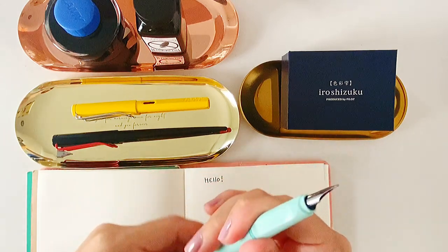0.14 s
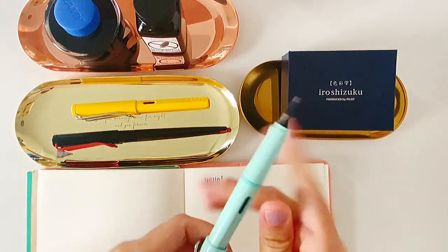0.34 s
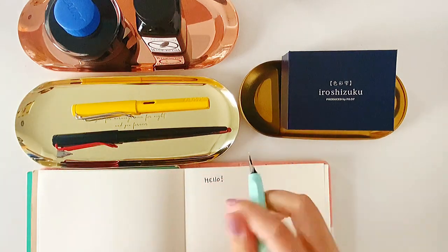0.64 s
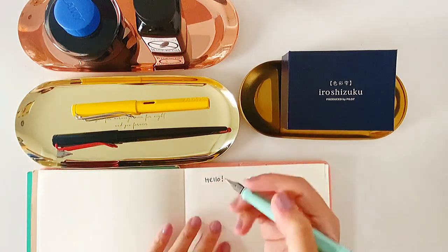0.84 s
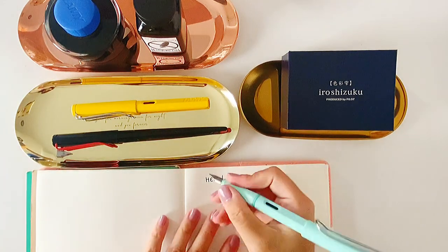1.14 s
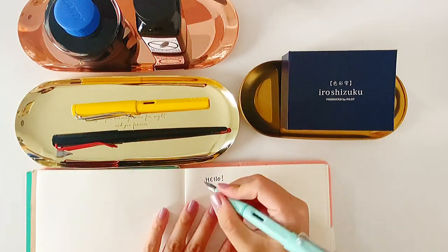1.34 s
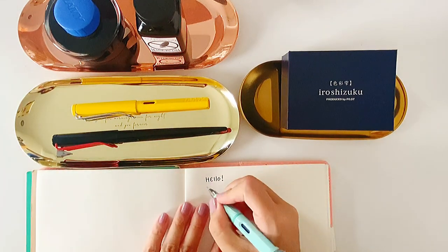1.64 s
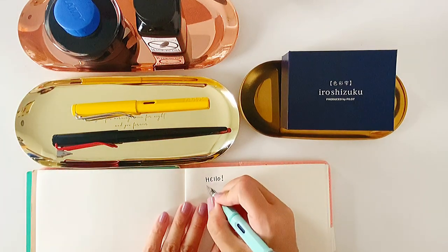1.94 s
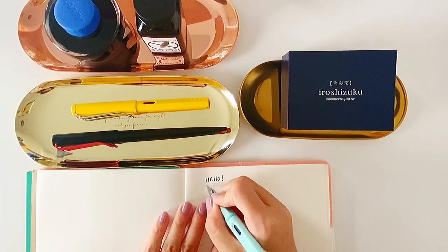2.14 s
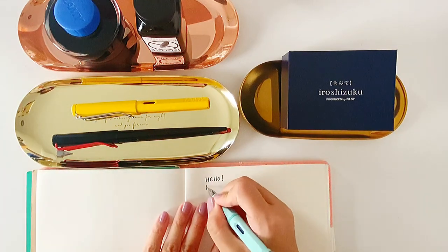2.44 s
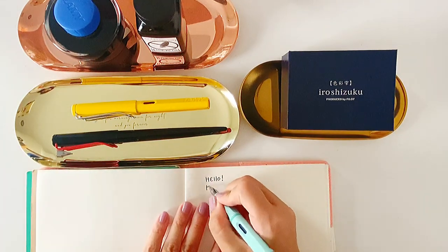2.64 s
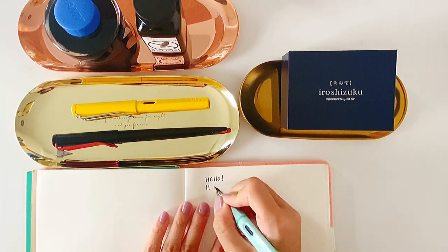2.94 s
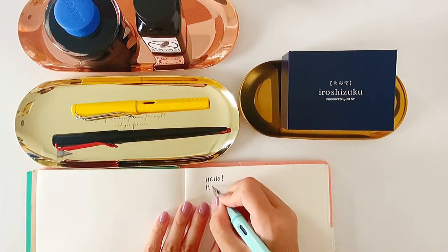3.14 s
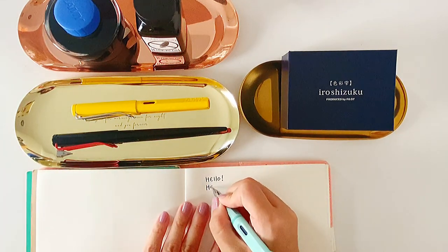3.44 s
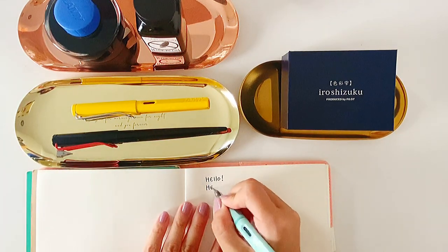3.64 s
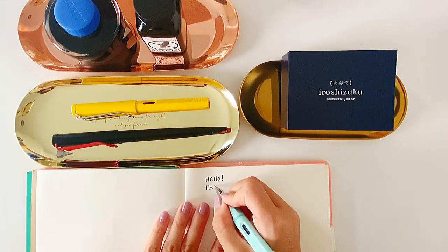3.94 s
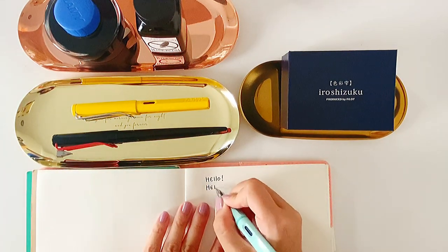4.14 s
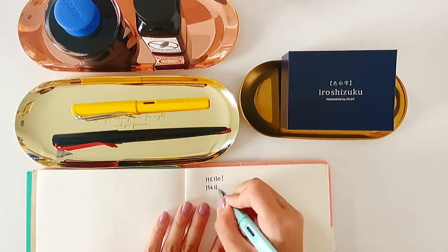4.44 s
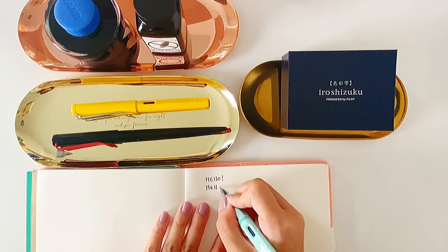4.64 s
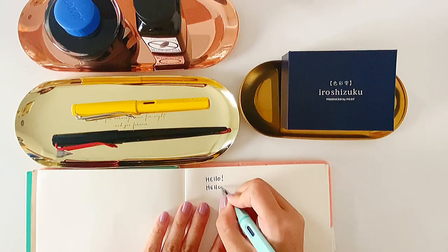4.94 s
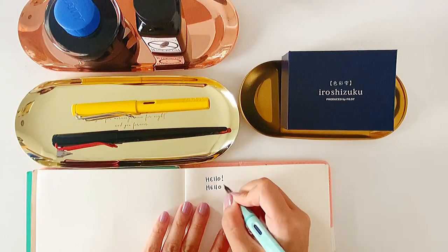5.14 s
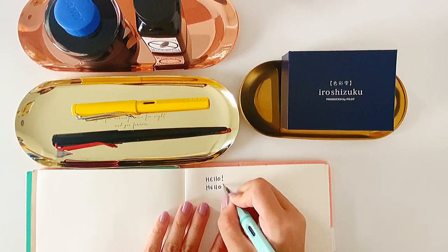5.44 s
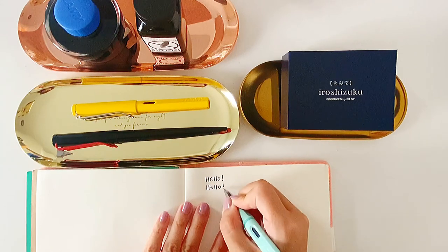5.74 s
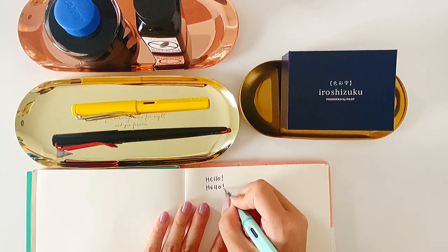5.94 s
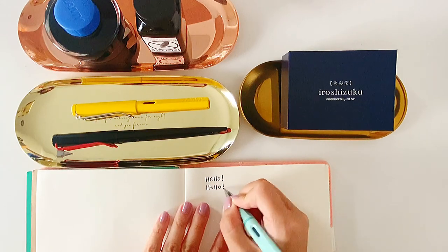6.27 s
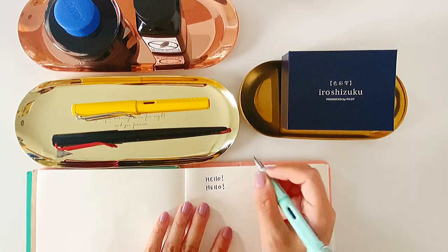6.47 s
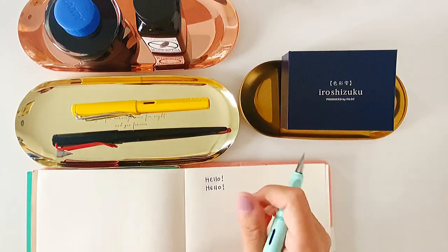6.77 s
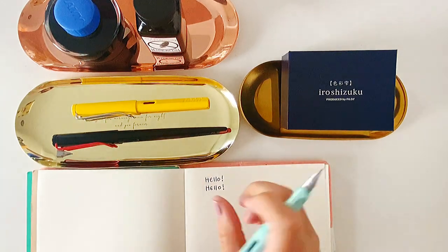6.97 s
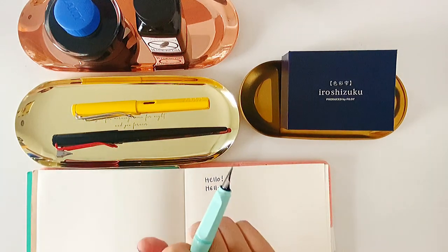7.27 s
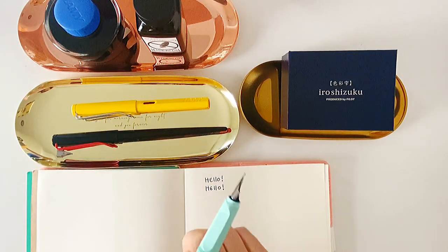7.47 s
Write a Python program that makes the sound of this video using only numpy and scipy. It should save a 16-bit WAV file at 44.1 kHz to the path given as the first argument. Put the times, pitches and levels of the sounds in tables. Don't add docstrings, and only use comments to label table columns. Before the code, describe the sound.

Close desk recording, dry and very quiet: light skin rubs and plastic clicks as a pen is turned, a palm settling on paper, then thin, papery nib scrapes in little groups, some faintly ringing. After the last faint stroke come soft rustles, a few taps, and a rapid stick-slip squeak of finger on barrel. Distant machinery rumbles, throbs and wavers faintly throughout.

```python
import sys
import numpy as np
from scipy import signal
from scipy.fft import rfft, irfft, next_fast_len
from scipy.io import wavfile
from scipy.ndimage import uniform_filter1d

SR = 44100
rng = np.random.default_rng(int(sys.argv[2]) if len(sys.argv) > 2 else 0)


def voltage_ratio(decibels):
    exponent = np.asarray(decibels, float) / 20
    return 10 ** exponent


def transcribe(u):
    v = np.clip(np.atleast_2d(u).T, -1, 1)
    q = np.round(v * 32767).astype(np.int16)
    wavfile.write(sys.argv[1], SR, q)


N = 335601


def evened(x):
    return x / np.sqrt(np.mean(x ** 2) + 1e-20)


def filtered(x, gain):
    size = next_fast_len(len(x))
    spectrum = rfft(x, size) * gain(np.fft.rfftfreq(size, 1 / SR))
    return evened(irfft(spectrum, size)[:len(x)])


def coloured(x, spectrum):
    f, db = np.transpose(spectrum)
    return filtered(x, lambda hz: voltage_ratio(np.interp(np.log(hz + 1), np.log(f + 1), db)))


def mode(x, centre_hz, width):
    return filtered(x, lambda hz: 1 / (1 + 2j * (hz - centre_hz) / width) / (1 + 1j * (hz - centre_hz) / width))


def resonate(x, hz, width):
    turn = np.exp(2j * np.pi * np.cumsum(hz * np.ones(len(x))) / SR)
    r = np.exp(-np.pi * width / SR)
    return 2 * (turn * signal.lfilter([1 - r], [1, -r], x / turn + 1e-18)).real


def wander(per_s):
    return filtered(rng.standard_normal(N), lambda hz: (hz > 8) / (1 + (hz / per_s) ** 4))


def grit(per_s, spread_db):
    size_db = spread_db * np.minimum(rng.exponential(1, N), 4)
    return rng.standard_normal(N) * voltage_ratio(size_db) * (rng.random(N) < per_s / SR)


def add(mix, s, sound):
    part = mix[round(s * SR):][:len(sound)]
    part += sound[:len(part)]


def glide(seconds, rise, fall):
    u = np.linspace(0, 1, round(seconds * SR))
    return np.sin(np.pi / 2 * np.clip(np.minimum(u / rise, (1 - u) / fall), 0, 1)) ** 2


def level(moves, column, rise, fall):
    power = np.zeros(N)
    for row in moves:
        add(power, row[0], (voltage_ratio(row[column]) * glide(row[1], rise, fall)) ** 2)
    return uniform_filter1d(np.sqrt(power), size=250)


def ring(hz, t60, seconds=0.071):
    t = np.arange(round(seconds * SR)) / SR
    return np.sin(2 * np.pi * hz * t) * voltage_ratio(-60 * t / np.maximum(t60, .001))


def burst(hz, t60, spread):
    puff = rng.standard_normal(441) * voltage_ratio(-60 * np.arange(441) / SR / t60)
    band = signal.butter(3, [hz / spread, min(hz * spread, .45 * SR)], "band", fs=SR, output="sos")
    sound = signal.sosfilt(band, np.append(3, 0.47 * puff))
    return sound / abs(sound).max()


# f/Hz, level/dB per Hz
RUMBLE = [(35, -35), (60, -0.5), (73, -5), (87, -11), (113, -9.5), (129, -15), (145, -12.5), (166, -8),
          (232, -12), (250, -18.5), (269, -20.5), (318, -15), (366, -23.5), (388, -29), (440, -24),
          (570, -70), (970, -120)]
AIR = [(240, -6), (400, -9), (528, 1), (645, -7.5), (742, -7.5), (852, -10.5), (979, -6), (1090, -9),
       (1180, -8), (1960, -17.5), (2470, -21), (4440, -28), (6050, -27.5), (15000, -33.5), (16000, -42)]
RUMBLE_DB, AIR_DB = -50, -61
# f/Hz, width/Hz, level/dB
DRONES = [(5.77, 6.9, -40), (16.77, 4.8, -44.5), (42.3, 8.6, -58), (48.84, 2.6, -50), (57.08, 1.08, -50),
          (23.9, 10, -46), (1006, 32, -75), (552, 73, -74.5), (726, 80, -76), (4600, 630, -82.5)]
# t/s, level/dB
MACHINE = [(0.0, -57), (0.47, -56.5), (0.51, -47.5), (0.89, -66.5), (0.95, -52.5), (1.31, -60), (1.35, -53),
           (1.42, -55), (1.82, -56), (1.95, -50), (2.03, -57), (2.09, -54.5), (5.14, -56.5), (6.79, -54.5),
           (7.41, -58), (7.6, -56)]
# f/Hz, width/Hz, level/dB
MACHINE_TONES = [(241.7, 23.6, -3.5), (322.8, 19.2, -8.5), (359.9, 17.5, -9.5)]
# t/s, throb level/dB
THROB = [(0.0, -40.5), (1.99, -37), (2.18, -74), (2.56, -34.5), (3.41, -50), (4.11, -35), (4.3, -49),
         (5.17, -41.5), (7.61, -34)]
THROB_HZ = 25.0
# f/Hz, level/dB, start/turns
HUMS = [(120.2, -62, .0), (121.19, -62, .5)]


def room_tone():
    t = np.arange(N) / SR
    out = voltage_ratio(RUMBLE_DB) * coloured(rng.standard_normal(N), RUMBLE)
    out += voltage_ratio(AIR_DB) * coloured(rng.standard_normal(N), AIR)
    for hz, width, db in DRONES:
        out += voltage_ratio(db) * mode(rng.standard_normal(N), hz, width)
    machine = sum(voltage_ratio(db) * mode(rng.standard_normal(N), hz, width) for hz, width, db in MACHINE_TONES)
    out += voltage_ratio(np.interp(t, *np.transpose(MACHINE))) * machine
    throb = voltage_ratio(np.interp(t, *np.transpose(THROB)))
    out += np.sqrt(2) * throb * np.sin(2 * np.pi * THROB_HZ * t)
    for hz, db, turns in HUMS:
        out += np.sqrt(2) * voltage_ratio(db) * np.sin(2 * np.pi * (hz * t + turns))
    return out


# t/s, level/dB
DESK_ECHOES = [(.0007, -59), (.0029, -32), (.0048, -51)]
ROOM_DB, ROOM_T60 = -20, 0.18


def desk(x):
    t = np.arange(SR // 3) / SR
    dull = signal.lfilter([.5], [1, -.5], rng.standard_normal(len(t)))
    tail = dull * voltage_ratio(-60 * t / ROOM_T60) * (t > .006)
    path = voltage_ratio(ROOM_DB) * tail / np.linalg.norm(tail)
    path[round(0.0013 * SR)] += voltage_ratio(0.0039)
    for s, db in DESK_ECHOES:
        path[round(s * SR)] += voltage_ratio(db)
    return signal.oaconvolve(x, path / np.linalg.norm(path))[:N]


# t/s, peak level/dB, ring f/Hz, ring t60/s, bright snap
# level/dB against the peak
TICKS = [(0.1915, -39, 2620, 0.015, 0), (0.6722, -40.5, 4030, 0.016, -11), (0.6725, -46, 1820, 0.012, -15),
         (0.6764, -46, 1900, 0.0092, -21), (0.6796, -46, 1560, 0.012, -24),
         (0.679, -44.5, 4600, 0.016, -24), (0.73, -45.5, 1500, 0.014, -20), (0.73, -40, 4600, 0.01, -7),
         (0.7674, -34.5, 3650, 0.028, -16), (.8357, -39, 4300, 0.011, -14),
         (0.7693, -43.5, 1870, 0.028, -25), (1.156, -39.5, 5150, 0.012, -18),
         (1.873, -60, 2060, 0.015, -15), (2.3446, -54, 1840, 0.013, -22), (2.4484, -57, 1910, 0.015, -19),
         (2.5565, -47.5, 1660, 0.014, -30), (2.575, -51, 1960, 0.014, -18), (2.5884, -50, 1770, 0.013, -22),
         (4.9064, -49, 2150, 0.015, -17), (5.523, -57, 2100, 0.02, -21), (6.0084, -52, 1946, 0.015, -15),
         (6.936, -48.5, 2400, 0.015, 2), (7.4733, -41, 2470, 0.013, -6)]
# t/s, peak level/dB, centre f/Hz
SNAPS = [(0.05, -55, 9500), (.0685, -59, 10500), (.1326, -61, 13000), (0.191, -42, 6000),
         (.3330, -48, 11500), (.3708, -44, 10910), (.371, -50, 14000), (.1912, -48, 13500),
         (.192, -50, 3650), (.7499, -51, 5800), (.7572, -52, 4500), (0.7636, -49, 4500),
         (.7692, -35.5, 2260), (.7678, -41, 9900), (.768, -48, 13500), (.6728, -48, 12000),
         (.6762, -52, 12500), (.673, -58, 15800), (.7297, -45, 13000), (.7298, -52, 16100),
         (0.7717, -51, 2900), (0.771, -41, 4600), (.7776, -44, 3970), (.7830, -50, 5200),
         (.7885, -47, 4270), (.7938, -46, 3570), (.7972, -48, 4800), (.8065, -47, 2700), (0.8, -42, 5300),
         (0.804, -42, 4600), (0.808, -48, 5000), (.8179, -51, 3600), (.8358, -38, 4100), (.8360, -42, 5400),
         (2.424, -52, 3200), (2.5834, -53, 4500), (2.5841, -51, 13500), (2.5843, -62, 8000),
         (2.8750, -55, 11000), (2.8762, -36, 10000), (2.8764, -34, 12500), (2.8765, -48, 7200),
         (2.8766, -38, 14500), (2.8805, -45, 10500), (2.8825, -50, 10990), (2.8845, -56, 12000),
         (3.103, -60, 4180), (4.68, -54, 4180), (4.6810, -54, 6400), (4.6812, -57, 10000),
         (6.7545, -50, 11000), (6.7540, -57, 3500), (6.7545, -56, 5600), (6.7556, -54, 8000),
         (6.937, -49, 5950), (6.936, -53, 13000), (6.9365, -58, 4200), (.3332, -52, 9000),
         (2.5842, -55, 16100), (2.8764, -45, 16100), (7.4735, -50, 3600), (7.5593, -48, 6000)]
# t/s, peak level/dB, ring f/Hz, ring t60/s
KNOCKS = [(.3310, -48, 900, .02), (.3315, -49, 3400, 0.01), (.3320, -41, 4300, 0.011),
          (.7690, -37, 1500, 0.024), (.7700, -42, 900, .018), (.7705, -42, 540, .025),
          (1.3441, -34, 1012, .032), (1.3442, -37, 711, 0.034), (1.3443, -42, 520, 0.015),
          (1.3445, -48, 2180, .03), (1.3452, -41, 285, 0.05), (3.1034, -41, 1000, 0.018),
          (3.1034, -52, 3520, .018), (3.1034, -37, 720, 0.014), (3.1034, -39, 500, 0.025),
          (3.2130, -59, 3570, 0.049), (4.6800, -41, 1237, .035), (4.6801, -44.5, 3360, 0.03),
          (6.36, -52, 850, .04), (6.5695, -40, 540, 0.021), (6.5696, -43, 890, .02),
          (6.5697, -46, 1300, .015), (6.7548, -52, 4400, .018), (6.936, -44, 3000, .014),
          (7.4735, -38, 700, 0.014), (7.4736, -43, 1300, .01)]


def taps():
    out = np.zeros(N)
    for s, db, hz, t60, snap_db in TICKS:
        add(out, s, voltage_ratio(db - 7) * ring(hz, t60))
        add(out, s, voltage_ratio(db - 1) * burst(hz, .8 * t60, 1.3))
        add(out, s, voltage_ratio(db + snap_db) * burst(8400, 0.025, 1.23))
    for s, db, hz in SNAPS:
        add(out, s, voltage_ratio(db) * burst(hz, 0.0096, 1.123))
    for s, db, hz, t60 in KNOCKS:
        sound = ring(hz, t60)
        add(out, s, voltage_ratio(db) * sound * np.minimum(np.arange(len(sound)) / 30, 1))
        add(out, s, voltage_ratio(db - 12.0) * burst(hz, .012, 1.4))
    return out


# t/s, strength level/dB
SLIPS = [
    [(0.0037, -57), (0.0136, -55), (0.019, -54), (0.0238, -47), (0.0292, -46), (0.0351, -57), (0.0418, -46),
     (0.0494, -45.5), (0.0571, -53), (0.0626, -58), (0.0668, -48), (0.0749, -54), (0.0818, -59),
     (0.0879, -62)],
    [(7.1648, -67), (7.173, -58), (7.1772, -56), (7.1826, -55), (7.1932, -67), (7.1984, -65), (7.2042, -61),
     (7.2147, -54.5), (7.229, -54), (7.2365, -72), (7.2446, -53), (7.2587, -57), (7.271, -54),
     (7.2825, -53), (7.2914, -53), (7.2994, -54), (7.3091, -47), (7.3168, -51), (7.3213, -48), (7.329, -55),
     (7.3337, -57), (7.3423, -62), (7.3506, -52), (7.3558, -44), (7.3646, -49), (7.3712, -50),
     (7.3773, -41), (7.3828, -51), (7.3889, -41), (7.3956, -41), (7.4029, -38), (7.4096, -38),
     (7.4162, -42), (7.423, -38), (7.4303, -38.5), (7.4379, -41), (7.4456, -38.5), (7.4539, -38),
     (7.459, -52), (7.4663, -43), (7.4741, -48)],
]
SLIP_GAIN_DB = [3, -3]
# f/Hz, t60/s, level/dB
BARREL = [
    [(2400, 0.0057, -4.5), (2810, 0.0076, -8.5), (4740, 0.0036, -25), (10500, .002, -19)],
    [(710, 0.013, -14), (1500, 0.0024, -6), (2550, 0.011, -8), (3120, .006, -10), (4530, 0.0089, -7.5),
     (5200, .006, -10.5), (5800, .013, -10), (6140, 0.011, -10.5), (9000, 0.0016, 2.5),
     (11900, 0.00096, 7.5), (14600, 0.0013, 0)],
]
SLIP_DRAG, SLIP_DETUNE = .15, .015


def creaks():
    out = np.zeros(N)
    u = np.arange(-100, 500) / SR
    swell = np.exp(-(u / .0009) ** 2)
    drag = SLIP_DRAG * np.exp(-abs(u) / .01) * (u > 0)
    for slips, gain_db, modes in zip(SLIPS, SLIP_GAIN_DB, BARREL):
        for s, strength_db in slips:
            body = 0
            for k, (hz, t60, db) in enumerate(modes):
                bend = 1 + SLIP_DETUNE * rng.standard_normal()
                body = body + (-1) ** k * voltage_ratio(db) * ring(hz * bend, t60, .03)
            friction = .09 * (swell + drag) * rng.standard_normal(len(u))
            snap = 1.9 * (u == 0)
            add(out, s + u[0], voltage_ratio(strength_db + gain_db) * np.convolve(friction + snap, body))
    return out


# f/Hz, level/dB per Hz
FINGERTIP = [(5500, -41), (7500, -14.5), (9000, -7), (12000, -1.5), (14500, -4.5), (16000, -15)]
PALM = [(2400, -40), (3200, 1.5), (4000, 3), (4650, 3), (5300, 1.5), (6200, 1), (7500, -0.5), (10000, -6)]
PAGE = [(400, -16), (900, 1), (1500, -2.5), (2000, -1.5), (2800, -2.5), (3500, -20.5)]
BLOTCH_DB = 2.1
# t/s, length/s, fingertip hiss level/dB, palm rasp level/dB, page rustle level/dB
TAKE_UP = [(.0, 0.08, -74, -69.5, -63), (.1, 0.15, -71, -73, -64.5), (.165, 0.066, -53.5, -61, -69),
           (.18, 0.16, -65.5, -69, -64.5), (.27, 0.18, -64.5, -71, -65.5), (.42, 0.12, -66, -70, -72),
           (.57, 0.075, -64, -71, -69), (.715, 0.067, -68, -59, -61), (.765, 0.058, -62, -50.5, -59),
           (.8, 0.08, -63, -56.5, -61), (.835, 0.077, -62.5, -60, -67), (.88, 0.094, -71, -63, -65.5),
           (.93, 0.18, -68, -67.5, -65), (1.0, 0.14, -60.5, -59.5, -67), (1.08, 0.15, -58.5, -61.5, -70),
           (1.18, 0.17, -78, -70, -63.5), (1.225, 0.16, -62.5, -60.5, -62.5),
           (1.32, 0.17, -64, -62.5, -66.5)]
PUT_DOWN = [(6.193, 0.18, -59, -61, -67), (6.31, .11, -78, -70, -65.5), (6.385, 0.15, -71, -67, -66),
            (6.463, 0.12, -60.5, -55, -63), (6.528, 0.12, -55, -53.5, -61.5),
            (6.613, 0.12, -77, -68.5, -76), (6.729, 0.048, -74, -70, -74), (6.761, 0.092, -66, -72, -77),
            (6.826, 0.17, -69.5, -79, -85), (6.91, 0.13, -61, -70.5, -75), (6.99, 0.18, -67, -70.5, -83),
            (7.135, .12, -72, -69, -72), (7.257, 0.3, -62, -61.5, -62.5), (7.448, 0.13, -67, -66.5, -67),
            (7.503, 0.13, -56, -60.5, -61)]
RUB_RISE, RUB_FALL = 0.37, 0.33
# t/s, length/s, level/dB, f/Hz,
# width/Hz
HOLLOWS = [(.19, 0.053, -66, 2800, 400), (0.21, 0.23, -68.5, 3700, 1500), (0.766, 0.07, -62, 6300, 1800),
           (1.04, 0.21, -63, 2000, 680), (1.33, 0.14, -63, 1930, 510), (1.36, .12, -63.5, 1950, 690),
           (6.234, 0.13, -63.5, 2350, 500), (6.499, 0.16, -63, 4630, 500), (7.25, 0.24, -70, 2700, 200),
           (7.259, 0.24, -69, 5400, 300), (7.45, 0.11, -66, 2740, 300), (.14, 0.31, -67, 1275, 70),
           (.22, 0.22, -71, 2640, 700), (.43, .11, -75, 6490, 150), (.43, .07, -69, 8000, 250),
           (.49, 0.052, -72, 9300, 300), (.435, .09, -73, 10000, 1500), (.575, 0.065, -68, 9600, 3000),
           (.52, .07, -75, 9000, 7000), (.63, .1, -73, 10000, 8000), (6.94, .14, -73.5, 3370, 400),
           (7.05, 0.13, -78, 4300, 400), (6.4, .04, -62, 3200, 700), (6.775, .06, -66, 13500, 2000),
           (7.0, .06, -69, 13500, 1500), (6.69, 0.056, -76, 10000, 8000), (6.83, .08, -78, 7000, 6000),
           (6.69, .07, -76, 4000, 800), (5.33, 0.098, -66, 3900, 720), (4.6, 0.041, -61, 2400, 250),
           (5.365, 0.054, -60.5, 2360, 200), (5.33, .08, -75, 5160, 400), (4.83, .09, -67, 2350, 320),
           (3.16, 0.18, -74, 11800, 1200), (4.7, .12, -74, 11400, 1200), (2.08, 0.097, -61, 3100, 800),
           (2.64, .09, -68, 3500, 800), (.785, 0.039, -60, 3500, 2500)]


def hand():
    out = np.zeros(N)
    for column, colour in enumerate([FINGERTIP, PALM, PAGE], start=2):
        z = signal.stft(coloured(grit(12000, 1.5), colour), nperseg=256)[2]
        blotches = uniform_filter1d(rng.standard_normal(z.shape), size=5, axis=0)
        blotches = uniform_filter1d(blotches, size=14, axis=1)
        rub = signal.istft(z * voltage_ratio(BLOTCH_DB * evened(blotches)), nperseg=256)[1][:N]
        out += evened(rub) * level(TAKE_UP + PUT_DOWN, column, RUB_RISE, RUB_FALL)
    for s, length, db, hz, width in HOLLOWS:
        slide = glide(length, RUB_RISE, RUB_FALL)
        add(out, s, voltage_ratio(db) * slide * mode(rng.standard_normal(SR // 2), hz, width)[:len(slide)])
    return out


# f/Hz, width/Hz, level/dB
NIB = [(562, 470, 6.5), (3350, 460, -15), (3770, 570, -3.5), (5210, 440, -6.5), (6500, 210, -7),
       (9650, 860, -13), (11400, 2200, -1.5), (13300, 400, -22), (15500, 500, -13)]
TINES = [(.83, 0.03), (1.001, 0.74), (1.22, .4)]
TINE_WIDTH_HZ, TINE_CLIMB, WANDER_DB = 275, .02, 1.1
# f/Hz, level/dB per Hz
FIBRE = [(700, -29), (1500, 12.5), (2400, -4), (3200, 3.5), (4300, 4.5), (5400, 2.5), (6000, 3.5),
         (6600, -6), (7400, 1.5), (9000, 0), (11500, 3), (13500, 4), (15800, -2.5)]
# t/s, length/s, pressure as tine ring level/dB, speed as fibre hiss level/dB, tine f/Hz
STEMS = [(2.045, 0.17, -54.5, -60.5, 1823), (2.09, 0.081, -54.5, -54, 2000), (2.15, .06, -71, -72, 1990),
         (2.21, 0.036, -69, -71, 2020), (2.39, 0.062, -55, -66, 2050), (2.41, 0.075, -55, -69, 1880),
         (2.625, 0.13, -50, -58, 1800), (2.7, 0.031, -55, -61, 1930), (2.78, 0.09, -63, -59.5, 1930),
         (3.55, .11, -66, -56.5, 2020), (3.89, 0.12, -62, -55.5, 1945), (4.19, 0.17, -60, -56, 2400),
         (4.33, 0.16, -64.5, -60, 2140), (4.99, 0.1, -65.5, -57, 2100), (5.315, 0.079, -56.5, -65, 2090),
         (5.345, 0.081, -57, -65, 2100), (5.42, 0.022, -66, -78, 2200), (5.455, 0.035, -70, -76, 2100),
         (5.87, 0.062, -68.5, -82, 2110), (5.96, 0.095, -65, -87, 2100)]
LOOPS = [(3.14, 0.057, -59.5, -70, 1930), (3.168, 0.09, -63, -60.5, 1970), (3.225, 0.11, -56, -78, 1770),
         (3.264, 0.065, -63, -66, 1930), (3.341, 0.048, -60, -71, 1930), (3.401, 0.14, -57, -74, 1800),
         (3.465, 0.067, -67, -67, 1960), (4.663, 0.063, -65, -61, 2210), (4.696, .08, -63, -67, 2080),
         (4.734, 0.1, -58, -65.5, 2400), (4.79, 0.072, -73, -66, 2200), (4.802, 0.16, -57.5, -77, 2220),
         (4.906, 0.07, -72, -65.5, 2180)]
STROKE_RISE, STROKE_FALL = 0.42, 0.57


def nib():
    strokes = np.array(sorted(STEMS + LOOPS))
    middle = strokes[:, 0] + strokes[:, 1] / 2
    tine_hz = np.interp(np.arange(N) / SR, middle, strokes[:, 4]) * (1 + TINE_CLIMB * wander(25))
    pressure = level(strokes, 2, STROKE_RISE, STROKE_FALL) * voltage_ratio(WANDER_DB * wander(60))
    speed = level(strokes, 3, STROKE_RISE, STROKE_FALL) * voltage_ratio(WANDER_DB * wander(60))
    catches = grit(9000, 2.4)
    scrape = mode(mode(catches, 2030, 1330), 2030, 1330)
    tines = sum(share * evened(resonate(scrape, bend * tine_hz, TINE_WIDTH_HZ)) for bend, share in TINES)
    upper = sum(voltage_ratio(db) * mode(catches, hz, width) for hz, width, db in NIB)
    hiss = coloured(grit(14000, 1.3), FIBRE)
    both = np.sqrt(abs(pressure * speed))
    return tines * pressure + 0.44 * upper * both + 0.57 * hiss * speed


def scene():
    close = nib() + hand() + taps() + creaks()
    return (desk(close) + room_tone())[None]


def top_cut(x):
    return signal.sosfilt(signal.butter(12, 16480, fs=SR, output="sos"), x)


EDGE_HZ, CLICK_DB, CLICK_RISE_DB = 15830, -68, 7.5


def record(dry):
    edge = signal.firwin(801, EDGE_HZ, window=("kaiser", 6), fs=SR)
    low = signal.oaconvolve(dry, edge[None], "same")
    high = dry - low
    quick, slow = (uniform_filter1d(high ** 2, size=size) for size in (64, 2048))
    click = quick > voltage_ratio(2 * CLICK_DB) + voltage_ratio(2 * CLICK_RISE_DB) * slow
    mix = low + high * uniform_filter1d(1. * click, size=128)
    return top_cut(mix)


dry = scene()
out = record(dry)
transcribe(out)
```